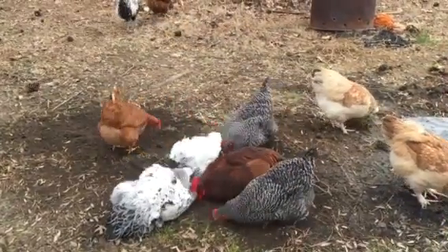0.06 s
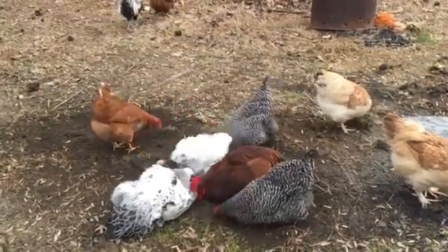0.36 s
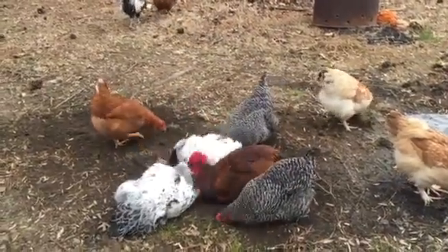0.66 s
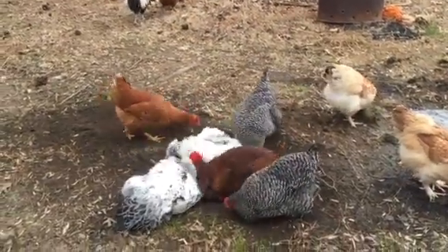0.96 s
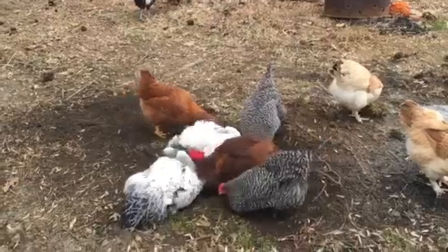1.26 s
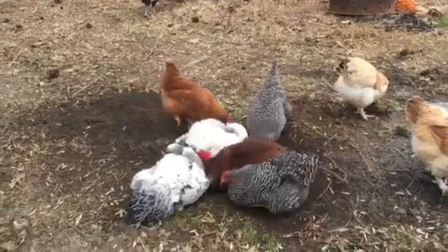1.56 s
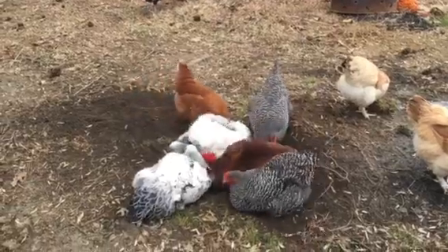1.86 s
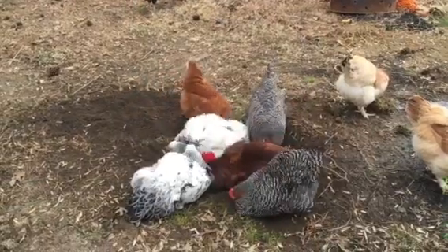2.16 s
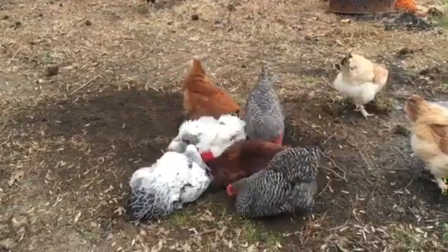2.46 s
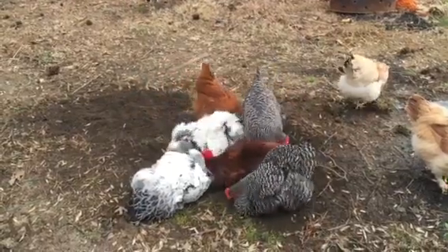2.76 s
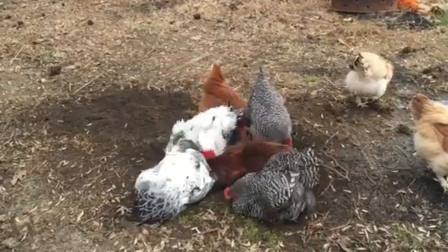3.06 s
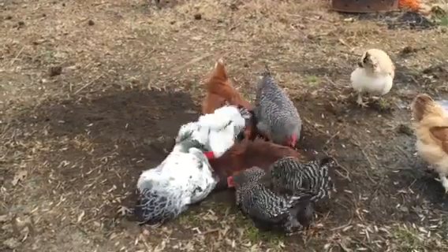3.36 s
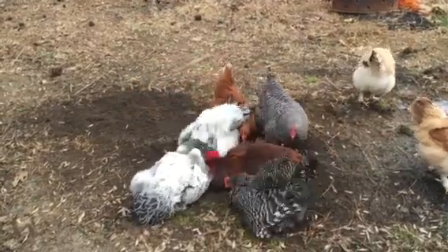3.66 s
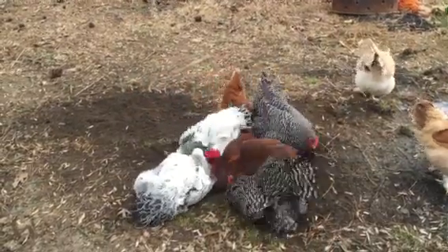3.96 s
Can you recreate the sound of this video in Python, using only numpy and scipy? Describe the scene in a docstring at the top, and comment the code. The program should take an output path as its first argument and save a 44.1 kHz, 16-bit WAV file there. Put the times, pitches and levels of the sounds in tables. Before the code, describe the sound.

Light wind buffets the microphone while hens rustle faintly in dry dirt and leaves.

```python
"""Hens dust-bathing in a breeze

Feathers rub over dry dirt and leaf litter in swells of friction noise, grit and leaves snap with
briefly ringing modes, and one hen gives short soft clucks, harmonic tones shaped by her throat.
Turbulence in a light, uneven breeze buffets the microphone with a low rumble and dull puffs.
Behind lies the broadband wash of a quiet yard with a faint far hum."""
import sys
import numpy as np
from scipy import signal
from scipy.fft import rfft, irfft, next_fast_len
from scipy.io import wavfile
from scipy.ndimage import uniform_filter1d, map_coordinates

SR = 44100
rng = np.random.default_rng(int(sys.argv[2]) if len(sys.argv) > 2 else 0)


def log_audio(samples):
    """Write samples as a 16-bit WAV file to the path given in sys.argv[1]."""
    # one column per channel
    frames = np.atleast_2d(samples).T
    # limit to full scale, then quantise
    limited = np.clip(frames, -1, 1)
    pcm = np.round(limited * 32767).astype(np.int16)
    wavfile.write(sys.argv[1], SR, pcm)


N = 176400


def amp(db):
    """Amplitude ratio: a factor of ten for every 20 dB."""
    return 10 ** (np.asarray(db) / 20)


def unit(x):
    """Normalisation to rms 1."""
    return x / np.sqrt(np.mean(x ** 2) + 1e-20)


def along(points, hz):
    """Interpolation of (frequency, value) points on a logarithmic frequency axis."""
    knot_hz, values = np.transpose(points)
    return np.interp(np.log(hz + 1), np.log(knot_hz + 1), values)


def wobble(per_s):
    """Smooth random modulation: a spline through per_s Gaussian knots a second."""
    knots = rng.standard_normal(int(N * per_s / SR) + 4)
    return map_coordinates(knots, [np.arange(N) * per_s / SR])


def filtered(x, response):
    """Linear filtering: the spectrum of x is multiplied by a frequency response."""
    size = next_fast_len(len(x) + 8192)
    return irfft(rfft(x, size) * response(np.fft.rfftfreq(size, 1 / SR)), size)[:len(x)]


def highpass_gain(hz, edge_hz):
    """Second-order high-pass response, falling 12 dB an octave below the edge."""
    return hz ** 2 / np.hypot(hz ** 2, edge_hz ** 2)


def coloured(x, spectrum):
    """Spectral shaping by (frequency_hz, gain_db) points, normalised to rms 1."""
    return unit(filtered(x, lambda hz: amp(along(spectrum, hz))))


def specks(per_s, spread_db):
    """Shot noise: randomly timed impulses of log-normal size, at rms 1."""
    signed_hits = (rng.random(N) < per_s / SR) * rng.choice([-1, 1], N)
    return unit(signed_hits * amp(spread_db * rng.standard_normal(N)))


def evened(x, span_s):
    """Division by the running rms flattens swells longer than span_s."""
    size = max(int(span_s * SR), 8)
    power = uniform_filter1d(uniform_filter1d(x ** 2, size), size)
    return x / np.sqrt(np.abs(power) + 0.012)


def patchy(x, depth_db):
    """Short-lived resonances: a random gain ripples over time and frequency."""
    spectra = signal.stft(x, nperseg=1024)[2]
    ripple = uniform_filter1d(rng.standard_normal(spectra.shape), size=5, axis=0)
    ripple = uniform_filter1d(ripple, size=5, axis=1)
    return signal.istft(spectra * amp(depth_db * unit(ripple)), nperseg=1024)[1][:len(x)]


def add(out, start_s, sound):
    """Superposition of a sound onto out, beginning at start_s."""
    part = out[max(round(start_s * SR), 0):][:len(sound)]
    part += sound[:len(part)]


# Spectra of the wind's rumble and flutter: frequency_hz, gain_db
RUMBLE_SPECTRUM = [(20, -47), (35, -12.5), (55, 0.5), (85, 0), (140, -5.5), (200, -17.5), (320, -27),
                   (600, -82)]
FLUTTER_SPECTRUM = [(60, -26), (130, 0.5), (200, 8), (300, -6.5), (480, -14), (700, -34), (1000, -37),
                    (1600, -54.5)]
# Strength of the breeze, before trim: time_s, rumble_db, flutter_db
BREEZE_LEVELS = [(0.0, -37.5, -37.5), (0.04, -44.5, -53.5), (0.11, -27.5, -30.5), (0.13, -33.5, -31.5),
                 (0.36, -29.5, -34.5), (0.37, -36, -38.5), (0.6, -37, -37.5), (0.62, -33, -45.5),
                 (0.66, -45, -45), (0.77, -45.5, -53), (0.81, -48.5, -55), (0.85, -36.5, -43),
                 (0.93, -46.5, -59), (0.97, -49.5, -51), (1.04, -31.5, -37.5), (1.11, -44.5, -42),
                 (1.25, -39, -50), (1.31, -43.5, -38), (1.38, -31, -47.5), (1.47, -40.5, -41.5),
                 (1.49, -33, -42), (1.7, -35.5, -42), (1.74, -38, -35.5), (1.76, -39.5, -65),
                 (1.78, -35, -36), (1.84, -46, -52.5), (1.86, -34, -43), (1.97, -43, -60),
                 (1.99, -54, -59.5), (2.21, -33, -34), (2.23, -42.5, -52), (2.27, -37.5, -33),
                 (2.32, -42, -78), (2.37, -38, -47), (2.45, -50, -75), (2.51, -38.5, -69),
                 (2.55, -48.5, -50), (2.61, -39, -58), (2.65, -41, -49), (2.71, -46.5, -60),
                 (2.77, -40, -43.5), (2.8, -44.5, -57), (2.84, -57, -61), (2.88, -40.5, -39.5),
                 (2.96, -33, -42), (3.01, -45.5, -58), (3.11, -33.5, -38), (3.14, -38.5, -51),
                 (3.21, -34, -30.5), (3.24, -37.5, -36), (3.32, -40.5, -51), (3.34, -37, -51),
                 (3.41, -49.5, -51), (3.43, -36, -50), (3.49, -46, -65), (3.59, -38.5, -43),
                 (3.75, -48, -55), (3.8, -36, -40.5), (3.93, -43.5, -67), (4.0, -39.5, -37.5)]


def breeze(rumble_trim_db=1, flutter_trim_db=-2.5, eddies_per_s=400):
    """Turbulence: slow pressure swings rumble, and a stream of small eddies flutters on top."""
    time_s, *levels = np.transpose(BREEZE_LEVELS)
    rumble_db, flutter_db = [np.interp(np.arange(N) / SR, time_s, db) for db in levels]
    rumble = evened(coloured(rng.standard_normal(N), RUMBLE_SPECTRUM), span_s=0.033)
    eddies = specks(eddies_per_s, spread_db=2)
    flutter = evened(coloured(eddies, FLUTTER_SPECTRUM), span_s=0.038)
    return amp(rumble_db + rumble_trim_db) * rumble + amp(flutter_db + flutter_trim_db) * flutter


# Spectrum of the distant outdoor wash: frequency_hz, gain_db
YARD_SPECTRUM = [(30, -0.5), (100, 9), (250, 6), (450, -4), (800, -3), (1300, -7.5), (2200, -15.5),
                 (4000, -22.5), (8000, -26), (10500, -28), (15500, -27.5)]
# Far tones: pitch_hz, level_db, loudest_s, half_length_s
HUM_TONES = [(397.4, -72.5, 5, 3.5), (486, -63.5, 2.42, 0.64)]


def yard(wash_db=-60.5):
    """Ambient noise: a broadband wash under far tones, weakly modulated in level and frequency."""
    t = np.arange(N) / SR
    wash_gain = amp(wash_db + 0.18 * wobble(3.25))
    out = wash_gain * coloured(patchy(rng.standard_normal(N), depth_db=2.5), YARD_SPECTRUM)
    for pitch_hz, level_db, loudest_s, half_length_s in HUM_TONES:
        swell = amp(level_db + 0.66 * wobble(6.74)) / (1 + ((t - loudest_s) / half_length_s) ** 4)
        wavering_hz = pitch_hz * (1 + 0.0059 * wobble(7.4))
        out += swell * np.sin(2 * np.pi * np.cumsum(wavering_hz) / SR)
    return out


# Response of the hen's throat: frequency_hz, gain_db
THROAT_RESPONSE = [(300, -2), (720, 3), (1000, -5.5), (1200, -6), (1450, -36), (2200, -34)]
# Calls, before the throat: start_s, length_s, first_hz, last_hz, level_db, fundamental_gain_db
HEN_CALLS = [(0.014, 0.023, 343, 348, -56, -10.5), (3.135, 0.028, 431, 306, -48, -0.5),
             (3.368, 0.043, 329, 400, -51.5, 8.5)]


def clucks(dulling_db=10.5, echo_db=-14, echo_t60_s=0.073):
    """Source and filter: six gliding harmonics pass the throat; the yard adds a short faint echo."""
    out = np.zeros(N)
    for start_s, length_s, first_hz, last_hz, level_db, fundamental_gain_db in HEN_CALLS:
        progress = np.linspace(0, 1, int(length_s * SR))
        glide_hz = first_hz + (last_hz - first_hz) * progress
        pitch_hz = glide_hz * (1 + 0.027 * wobble(220)[:len(progress)])
        phase = 2 * np.pi * np.cumsum(pitch_hz) / SR
        note = np.zeros(len(progress))
        for k in range(1, 7):
            # The spectrum tilts down by dulling_db per harmonic over the call.
            source_db = fundamental_gain_db if k == 1 else -dulling_db * (k - 1) * (progress - 0.5)
            note += amp(source_db + along(THROAT_RESPONSE, k * pitch_hz)) * np.cos(k * phase)
        envelope = np.minimum(progress / 0.18, 1) * np.minimum((1 - progress) / 0.45, 1)
        add(out, start_s, amp(level_db) * note * envelope)
    t = np.arange(SR // 3) / SR
    tail = rng.standard_normal(len(t)) * amp(-60 * t / echo_t60_s)
    return out + amp(echo_db) * signal.fftconvolve(out, tail / np.linalg.norm(tail))[:N]


# Spectrum of rubbed leaf litter: frequency_hz, gain_db
LITTER_SPECTRUM = [(500, -1), (1500, 3.5), (3000, 3.5), (6000, -2), (9500, -0.5), (10600, -7.5), (12500, 2),
                   (15500, -5.5)]
# Strokes of feathers and feet, before trim: start_s, length_s, level_db, lower_edge_hz
FEATHER_STROKES = [(0.067, 0.24, -62.5, 5500), (0.359, 0.086, -67, 6200), (1.555, 0.084, -73, 3500),
                   (1.761, 0.068, -62, 2620), (1.901, 0.15, -67.5, 5970), (2.072, 0.091, -68.5, 4000),
                   (2.148, 0.1, -67.5, 5100), (2.552, 0.17, -74.5, 5000), (2.713, 0.11, -69.5, 4930),
                   (2.786, 0.15, -71.5, 5030), (3.061, 0.17, -61.5, 2980), (3.227, 0.26, -62, 4450),
                   (3.351, 0.27, -64, 2470), (3.318, 0.032, -52.5, 4970), (3.533, .11, -56.5, 1860),
                   (3.627, 0.092, -54, 2480), (3.695, .11, -52, 2380), (3.768, 0.15, -55.5, 3880),
                   (3.86, 0.14, -61, 3240)]


def feather_sweeps(grit_per_s=680, grit_share=0.33, clump_db=1, trim_db=-0.5):
    """Friction noise: feathers hiss over the dirt and throw clumps of grit in swelling strokes."""
    out, t = np.zeros(N), np.arange(SR) / SR
    for start_s, length_s, level_db, edge_hz in FEATHER_STROKES:
        grit = specks(grit_per_s, spread_db=6.5)[:SR]
        hiss = unit(patchy(rng.standard_normal(SR), depth_db=2.5))
        rub = np.sqrt(1 - grit_share) * hiss + np.sqrt(grit_share) * grit
        rub *= amp(clump_db * wobble(103)[:SR])
        rub = unit(filtered(rub, lambda hz: amp(along(LITTER_SPECTRUM, hz)) * highpass_gain(hz, edge_hz)))
        progress = t / length_s
        rise = np.sin(np.pi / 2 * np.minimum(progress / 0.37, 1))
        fall = np.exp(-(np.maximum(progress - 0.65, 0) / 0.19) ** 2)
        add(out, start_s, amp(level_db + trim_db) * rise * fall * rub)
    return out


# Grit and dry leaves snapping, before trim: start_s, level_db, pitch_hz
LITTER_SNAPS = [(.094, -45, 5560), (0.145, -46, 11900), (.277, -42, 9000), (0.309, -36.5, 7900),
                (0.4893, -45, 8500), (.509, -43, 8640), (.554, -50.5, 5500), (.598, -55, 11000),
                (.645, -57, 13000), (.669, -58.5, 10000), (.831, -42, 7170), (0.836, -56, 7650),
                (1.646, -50.5, 5600), (1.779, -39, 2530), (1.78, -37.5, 5750), (1.797, -45.5, 11300),
                (1.916, -47.5, 11900), (1.957, -44.5, 8900), (2.0, -50, 12500), (2.112, -45.5, 6140),
                (2.204, -47.5, 9040), (2.517, -42.5, 7950), (2.615, -59, 13000), (2.647, -44.5, 11600),
                (2.735, -51, 13000), (2.762, -54, 9000), (2.821, -44, 12600), (2.823, -51.5, 3300),
                (3.051, -48, 7100), (3.051, -48, 3500), (3.061, -50, 6100), (3.332, -36, 5950),
                (3.338, -36, 13100), (3.354, -36.5, 8830), (3.55, -40.5, 2900), (3.556, -56, 2420),
                (3.565, -26, 2520), (3.644, -39, 1390), (3.751, -34, 11400), (3.8, -39, 12600),
                (3.835, -37, 12400), (3.857, -40, 8200)]


def litter_ticks(attack_s=0.00037, crack_t60_s=0.0057, ring_t60_s=0.011, ring_db=-7.5, trim_db=-3):
    """Impulse excitation: a dry crack rings three damped modes, one at its pitch and two at random."""
    out, t = np.zeros(N), np.arange(SR // 25) / SR
    attack = 1 - np.exp(-t / attack_s)
    for start_s, level_db, pitch_hz in LITTER_SNAPS:
        noise = filtered(rng.standard_normal(len(t)), lambda hz: highpass_gain(hz, 0.53 * pitch_hz))
        crack = unit(noise) * amp(-60 * t / crack_t60_s)
        modes_hz = pitch_hz * np.append(1, np.exp(0.277 * rng.standard_normal(size=2)))
        ring = np.sin(2 * np.pi * np.outer(modes_hz, t)).sum(0) * amp(ring_db - 60 * t / ring_t60_s)
        ring *= 1 + 0.6 * wobble(1450)[:len(t)]  # fast modulation roughens the ring
        add(out, start_s, amp(level_db + trim_db) * (crack + ring) * attack)
    return out


# Response of the microphone opening: frequency_hz, gain_db
OPENING_RESPONSE = [(70, 2.5), (150, 2), (330, -2), (520, 2), (750, -0.5), (1150, -1.5), (1600, -18)]
# Single eddies, before trim and the opening: time_s, peak_db, bandwidth_hz
EDDY_HITS = [(0.118, -20.5, 350), (0.144, -25.5, 268), (0.166, -20.5, 266), (0.187, -31, 308),
             (0.217, -28.5, 410), (0.226, -24.5, 238), (0.242, -24, 208), (0.266, -32.5, 350),
             (0.276, -19, 198), (0.289, -21.5, 357), (0.324, -17, 537), (0.327, -28, 427),
             (0.333, -28.0, 264), (0.347, -24, 335), (0.387, -37, 423), (0.39, -21, 385),
             (0.428, -24.5, 323), (0.439, -28.5, 313), (0.448, -22, 157), (0.467, -32.5, 352),
             (0.473, -25.0, 230), (0.485, -25, 222), (0.511, -30, 274), (0.524, -28.0, 220),
             (0.543, -22.5, 270), (0.577, -34.5, 346), (0.584, -22.5, 242), (0.594, -26, 269),
             (0.635, -35.0, 258), (0.841, -28.5, 145), (0.971, -35.5, 238), (1.007, -26.5, 158),
             (1.023, -36, 210), (1.073, -31.5, 260), (1.151, -29.5, 247), (1.201, -23.5, 148),
             (1.242, -31, 304), (1.281, -26, 149), (1.363, -24.5, 243), (1.407, -28, 180),
             (1.435, -27, 200), (1.479, -30.0, 205), (1.504, -23, 250), (1.538, -31.5, 192),
             (1.573, -28, 237), (1.63, -25.5, 260), (1.675, -34, 220), (1.732, -21.5, 222),
             (1.784, -30, 240), (1.859, -26, 201), (2.18, -36, 190), (2.204, -30, 246), (2.268, -29.5, 221),
             (2.368, -32.5, 149), (2.648, -30, 139), (2.762, -37, 190), (2.884, -29, 223),
             (2.923, -26, 210), (2.96, -33, 160), (3.083, -33.5, 316), (3.091, -22, 189), (3.112, -24, 230),
             (3.183, -26, 200), (3.211, -20, 260), (3.243, -25.5, 204), (3.435, -30.0, 120),
             (3.589, -33, 176), (3.809, -35, 180)]


def wind_puffs(bass_cut_hz=120, lead_s=0.012, trim_db=-0.5):
    """High-pass overshoot: each eddy is a pressure pulse that the microphone's bass cut swings back."""
    out, t = np.zeros(N), np.arange(SR // 16) / SR
    bass_cut = signal.butter(2, bass_cut_hz, 'high', fs=SR)
    for time_s, peak_db, bandwidth_hz in EDDY_HITS:
        pulse = np.exp(-0.5 * (2 * np.pi * bandwidth_hz * (t - lead_s)) ** 2)
        puff = signal.lfilter(*bass_cut, pulse)
        add(out, time_s - lead_s, -amp(peak_db + trim_db) * puff / np.abs(puff).max())
    return filtered(out, lambda hz: amp(along(OPENING_RESPONSE, hz)))


def scene():
    """Superposition: the pressures of all sources add at one microphone."""
    return (breeze() + wind_puffs() + feather_sweeps() + litter_ticks() + clucks() + yard())[None]


def record(dry):
    """Band limiting: an ideal low-pass filter removes the highest treble."""
    top_hz = 15950
    return np.array([filtered(channel, lambda hz: hz < top_hz) for channel in dry])


dry = scene()
out = record(dry)
log_audio(out)
```